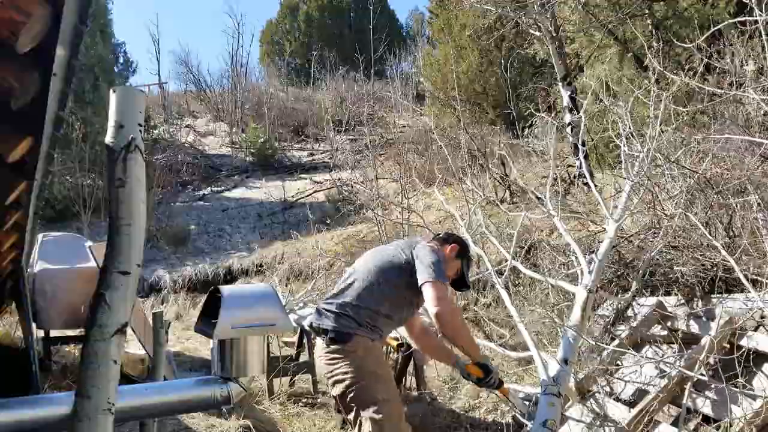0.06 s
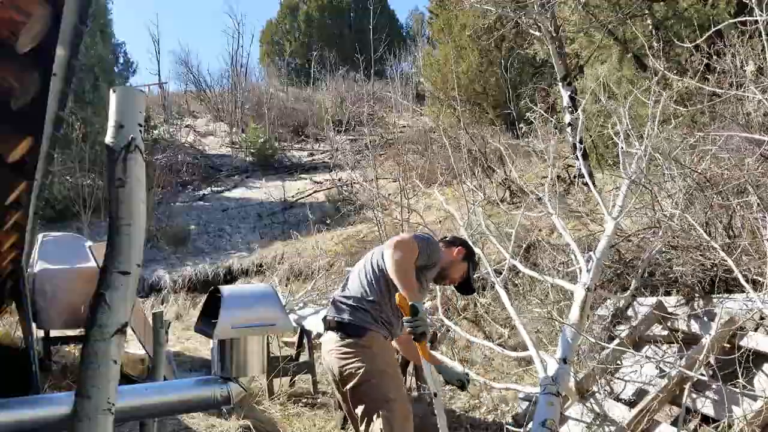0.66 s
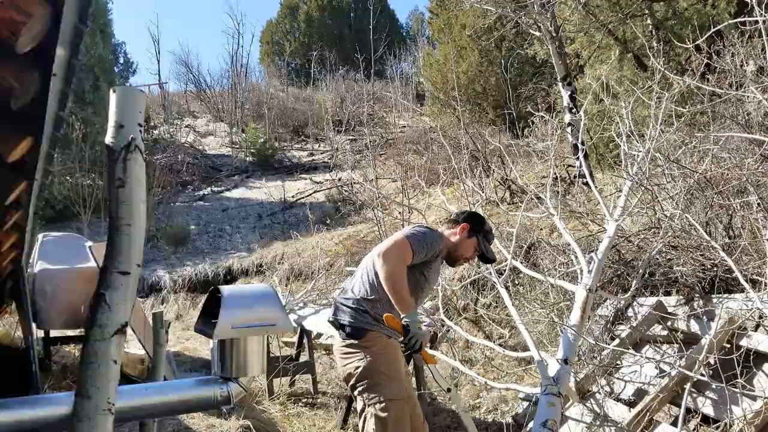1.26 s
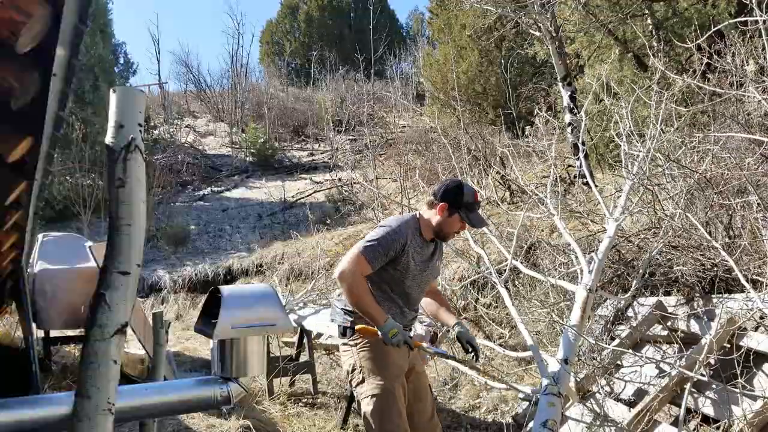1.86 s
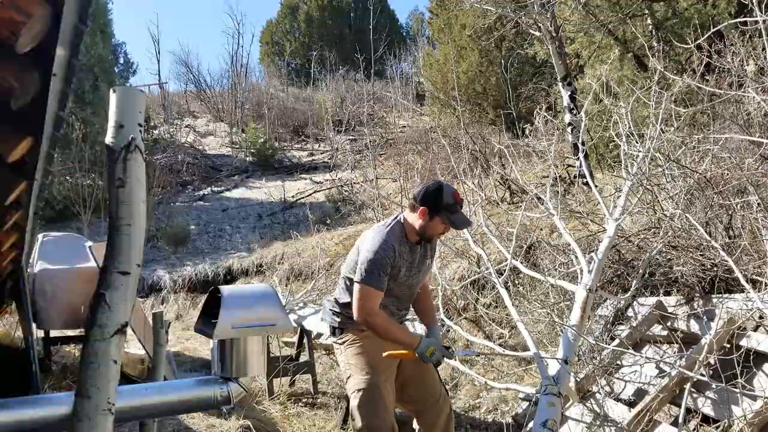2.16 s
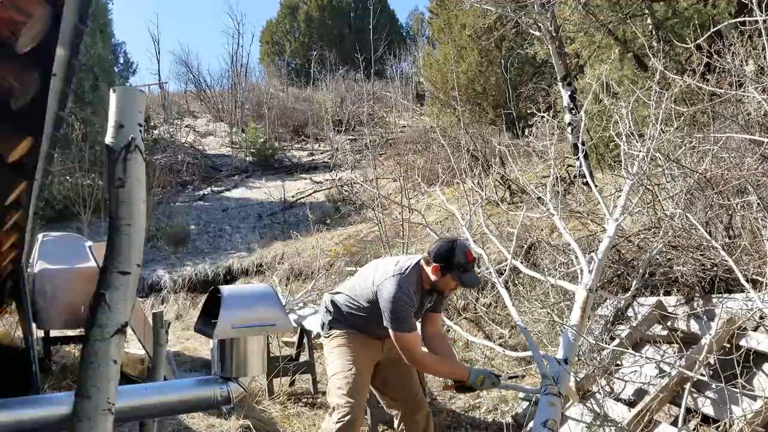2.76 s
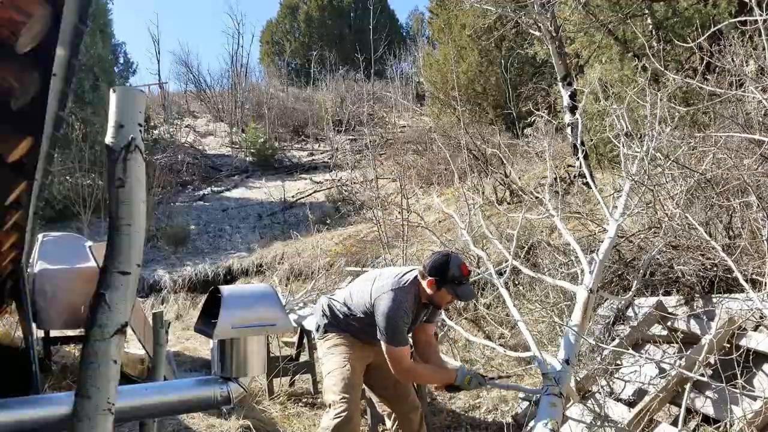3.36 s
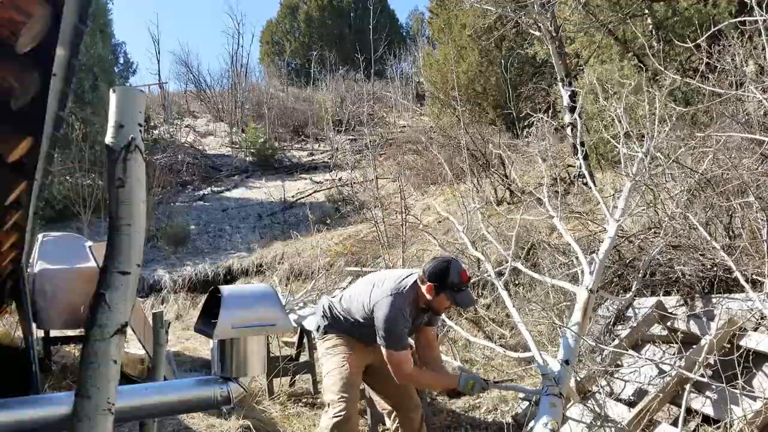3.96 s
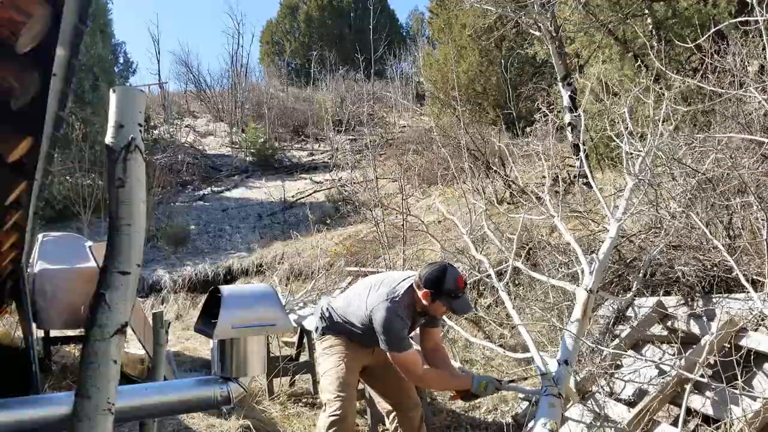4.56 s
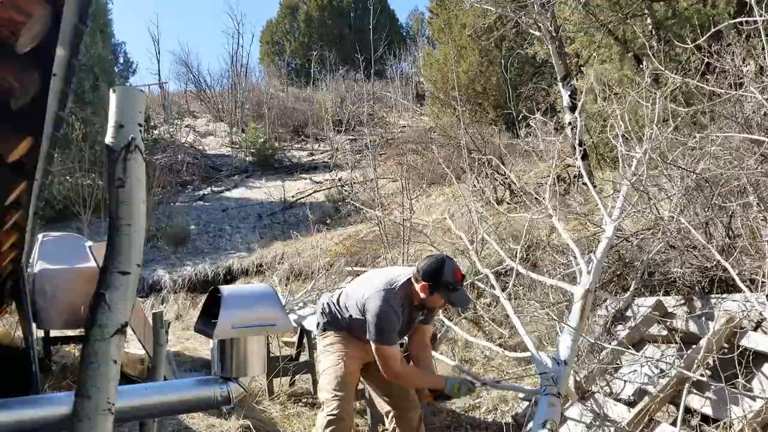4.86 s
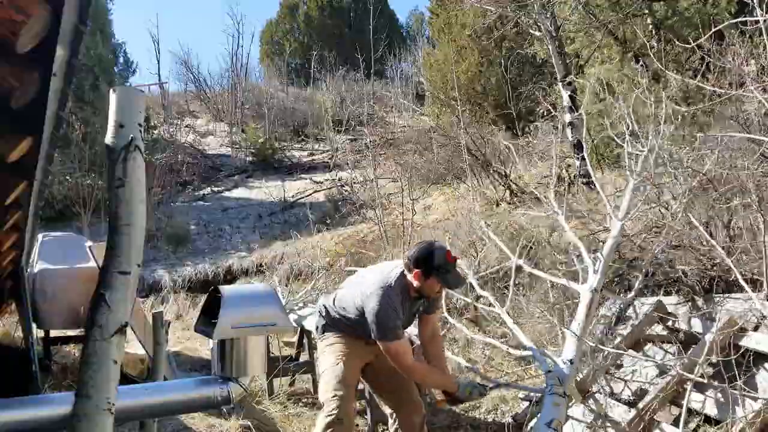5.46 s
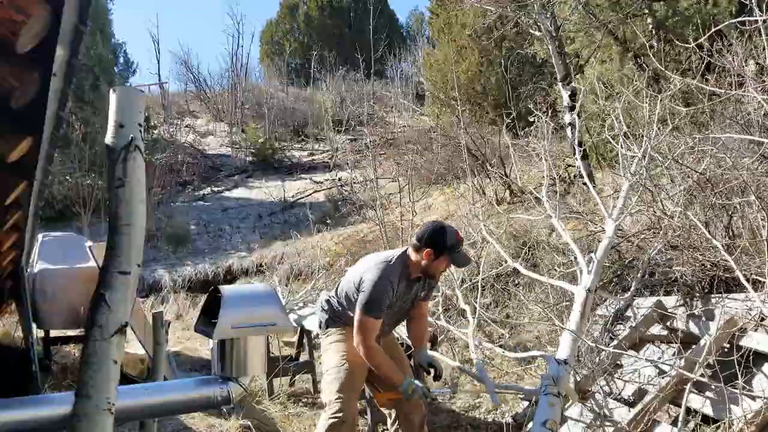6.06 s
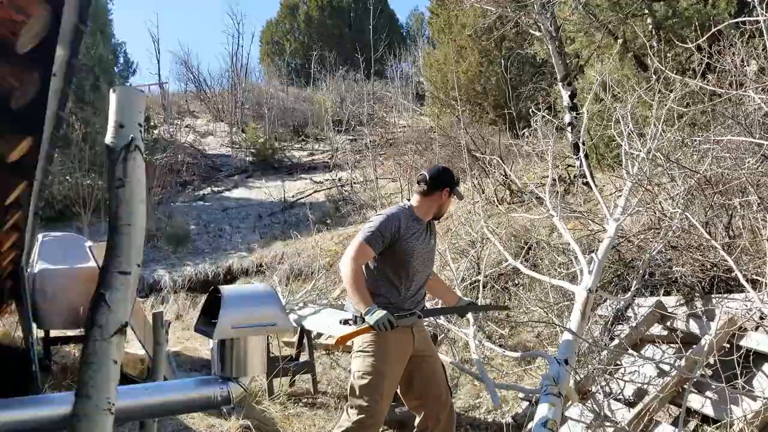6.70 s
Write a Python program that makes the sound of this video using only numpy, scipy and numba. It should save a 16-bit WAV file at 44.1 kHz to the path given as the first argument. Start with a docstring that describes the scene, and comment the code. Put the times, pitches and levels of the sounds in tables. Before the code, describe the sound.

A hand saw rasps through a green branch for four strokes, then the blade jumps out with a short clang. A few twigs tick and faint strokes brush the wood. Steady, buzzing back-and-forth sawing resumes until the branch tears, snaps and sinks with a rustle. It is outdoors, a few metres from the microphone, with dry grass hissing softly and gusts of wind rumbling mostly on the left.

```python
"""A hand saw rasps through a green branch on an open hillside, a few metres from a phone's two mic ports. Its
teeth shear wet fibres and shake the wood. After four strokes the blade jumps out and clangs; in faint strokes
it brushes twigs and dry grass, nine buzzing ones follow in the cut, and the branch tears, snaps and sinks. Dry
grass hisses in the breeze, and gusts buffet the ports, mostly the left."""
import sys
import numpy as np
from scipy import signal
from scipy.fft import rfft, irfft
from scipy.io import wavfile
from scipy.ndimage import uniform_filter1d
from numba import njit

SR = 44100
rng = np.random.default_rng(int(sys.argv[2]) if len(sys.argv) > 2 else 0)


def transcribe(signal):
    """Save signal, clipped to [-1, 1], as a 16-bit WAV file at the path in sys.argv[1]."""
    frames = np.atleast_2d(signal).T
    limited = np.clip(frames, -1, 1)
    pcm = np.round(limited * 32767).astype(np.int16)
    wavfile.write(sys.argv[1], SR, pcm)


N = 296793
TIME = np.arange(N) / SR
TOOTH_HZ = 380.3  # teeth crossing the cut each second at full speed
PORT_LAG_S = .0001  # the saw reaches the right port first
# spectrum of struck or cracking wood: frequency_hz, level_db
WOOD_CRACK = [(300, -20), (500, -11), (700, -5.5), (880, -5), (1100, 4), (1500, -4), (1800, .3),
              (2600, -0.5), (3100, -7), (4500, -14), (7500, -25), (15000, -27)]


def sawing():
    """Hiss of the steel, rasp of the wood and the hoarse note of the blade, all pulsed by the teeth."""
    steel = undb(1.16) * scattered(tooth_hiss, scatter_db=1.5, left_db=2.5)
    chatter = tooth_chatter()
    wood = scattered(wood_rasp, scatter_db=-5.5, left_db=1.0)
    note = scattered(blade_note, scatter_db=-5.5, left_db=1.5)
    return chatter * (steel + wood + note)


def strokes():
    """For each stroke: its samples, the blade speed 0-1 from turn to turn, and the rest of its row."""
    # saw strokes, the faint ones only the blade brushing twigs and dry grass: # start_s, fastest_s, end_s,
    # hiss_db, rasp_db, kerf_hz, note_hz, note_db
    saw_strokes = [(-.11, -.005, .095, -45.5, -50.5, 710, 4080, -58),
                   (0.084, .208, .295, -43, -50, 1460, 4200, -55),
                   (.29, 0.411, .51, -46.5, -52, 447, 4350, -59),
                   (.518, 0.597, .645, -41.5, -51, 620, 3800, -57),
                   (.915, 0.968, 1.06, -61.5, -73, 800, 3800, -76),
                   (1.232, 1.313, 1.41, -67.5, -77, 800, 2200, -78),
                   (1.608, 1.763, 1.9, -62.5, -71, 1350, 2200, -73),
                   (2.03, 2.197, 2.33, -57, -73, 1050, 2200, -73),
                   (2.571, 2.729, 2.87, -64, -64.5, 750, 2220, -78),
                   (2.945, 3.118, 3.265, -46, -55, 1455, 2340, -57),
                   (3.254, 3.391, 3.545, -47.5, -55, 1010, 2150, -58.5),
                   (3.555, 3.715, 3.845, -43.5, -52.5, 1400, 2480, -58.5),
                   (3.865, 3.984, 4.12, -48.5, -53, 1550, 2180, -56.5),
                   (4.114, 4.245, 4.355, -43, -50, 1360, 2170, -58),
                   (4.349, 4.46, 4.58, -44, -51, 1490, 2020, -56.5),
                   (4.58, 4.699, 4.81, -41.5, -49.5, 1370, 2450, -63),
                   (4.816, 4.929, 5.03, -47, -50, 1500, 2120, -65),
                   (5.01, 5.116, 5.265, -44.5, -54.5, 1390, 2380, -59),
                   (5.261, 5.39, 5.52, -57, -66.5, 1355, 2190, -74)]
    for start, fastest, end, *sound in saw_strokes:
        span = slice(max(int(start * SR), 0), int(end * SR))
        progress = np.interp(TIME[span], [start, fastest, end], [0, .5, 1])
        yield span, np.abs(np.sin(np.pi * progress)), sound


def grip(speed, seating=0.84):
    """How hard the teeth cut: it grows with blade speed, more slowly once they are seated."""
    return np.tanh(seating * speed) / np.tanh(seating)


def tooth_hiss(power=2.15, ring_db=-22, ring_rise_db_per_s=0.5):
    """Fibres shear on the teeth and faintly ring the blade, a little more as time goes on."""
    # spectrum of teeth shearing fibres: frequency_hz, level_db
    shear_spectrum = [(1200, -23), (2200, -8), (3200, -4.5), (4200, -3.5), (5200, -4.5), (7500, -2),
                      (9000, -4), (11000, -1.5), (13000, 1), (15500, -1.5)]
    shear, fractures = np.zeros(N), grains(per_s=7000, spread_db=1.5)
    for span, speed, (hiss_db, *_) in strokes():
        shear[span] += undb(hiss_db) * grip(speed) ** power * fractures[span]
    return colour(shear, shear_spectrum) + blade_ring(shear * undb(ring_db + ring_rise_db_per_s * TIME))


def tooth_chatter(depth=0.21):
    """A pulsing gain: teeth cross the cut at a rate set by the speed, each catching differently."""
    speed = np.zeros(N)
    for span, stroke_speed, _ in strokes():
        speed[span] = np.maximum(speed[span], stroke_speed)
    teeth_passed = np.cumsum(TOOTH_HZ * speed * (1 + 0.1203 * walk(90))) / SR
    catch_db = 1.6 * walk(320)
    return (1 + depth * speed * np.cos(2 * np.pi * teeth_passed)) * undb(catch_db)


def wood_rasp(power=2.2, kerf_width_hz=160, kerf_db=4, glide=.08, buzz_db=-19.5):
    """Coarse bites and tooth buzz shake the branch and the cut, whose resonance rises with speed."""
    # damped resonances of the wet branch: pitch_hz, width_hz, level_db
    branch_modes = [(417, 170, -0.5), (750, 250, 4), (1075, 230, 2.5), (1490, 370, -9.5)]
    wood, bites = np.zeros(N), grains(per_s=4000, spread_db=1.4)
    for span, speed, (_, rasp_db, kerf_hz, *_) in strokes():
        # grip and pressure change, so the tuning of the branch drifts during each stroke
        tuning = 1 + .05 * np.linspace(*rng.uniform(-1, 1, 2), len(speed))
        kerf = (kerf_hz * (1 + glide * (speed - 1)), kerf_width_hz, kerf_db)
        modes = [(hz * tuning, width, db) for hz, width, db in branch_modes] + [kerf]
        buzz = undb(buzz_db) * tooth_buzz(speed)
        body = np.zeros(len(speed))
        for hz, width, db in modes:
            own_bites = np.roll(bites[span], rng.integers(len(speed)))
            body += undb(db) * resonate(buzz + own_bites, hz, float(width))
        wood[span] += unit(body) * undb(rasp_db) * grip(speed) ** power
    return wood


def tooth_buzz(speed, jitter=.04, vary=.07, harmonics=6):
    """The row of teeth drums on the wood: a buzz that glides up and down with the blade speed."""
    uneven = np.repeat(rng.standard_normal(len(speed) // 200 + 1), 200)[:len(speed)]
    top_hz = TOOTH_HZ * (1 + vary * rng.uniform(-1, 1))  # no two strokes are equally fast
    phase = 2 * np.pi * np.cumsum(top_hz * speed * (1 + jitter * uneven)) / SR
    return sum(np.cos(k * phase) for k in range(1, harmonics + 1))


def blade_note(width_hz=580, glide=0.1, power=2.0):
    """The free length of the blade sings hoarsely, sliding up and down in turn as it runs in the cut."""
    out, scrape = np.zeros(N), noise()
    for index, (span, speed, (*_, note_hz, note_db)) in enumerate(strokes()):
        travel = np.cumsum(speed) / np.sum(speed) - .5
        hz = note_hz * (1 + (-1) ** index * glide * travel)
        note = resonate(resonate(scrape[span], hz, float(width_hz)), hz, float(2 * width_hz))
        out[span] += unit(note) * undb(note_db) * grip(speed) ** power
    return out


def blade_ring(force):
    """The steel blade rings in its bending modes."""
    # bending modes: pitch_hz, level_db, t60_s
    blade_modes = [(2729, -13, .07), (3828, 0, .28), (6508, -10, .06), (10410, -9, .06), (11640, -9, .06),
                   (12340, -7, .07), (13010, -8, .06), (13780, -9, .06)]
    return ring_modes(force, blade_modes)


def blade_knocks(ring_db=21, damped_s=0.712):
    """The blade jumps out and skips on the wood: the teeth rattle, and the first two knocks thud."""
    # knocks of the blade on the branch: time_s, level_db
    knocks = [(.6675, -30), (.670, -30.5), (.679, -36.5), (.683, -39.5)]
    # spectrum of the rattling teeth: frequency_hz, level_db
    clang_spectrum = [(400, -28), (800, -10), (1500, -4.5), (3000, -2.5), (4000, 2), (5000, -1),
                      (6300, 2.5), (8500, -2.5), (10500, 1), (13000, 4), (15500, 2)]
    rattle = colour(grains(per_s=8000, spread_db=2.5) * bursts(knocks, t60=0.047), clang_spectrum)
    thud = undb(-4.0) * colour(blows(knocks[:2]), WOOD_CRACK)
    # the second knock sets the blade ringing until a hand damps it
    damping = np.exp(-np.maximum(TIME - damped_s, 0) / 0.013)
    ring = undb(ring_db) * blade_ring(blows(knocks[1:2])) * damping
    ring_at_ports = np.array([undb(5.5) * delay(ring, PORT_LAG_S), ring])
    return outdoors(rattle + thud, scatter_db=2.0, left_db=2.5) + ring_at_ports


def breaking(click_db=12, ring_db=-9):
    """The branch tears and sinks; each snap is a click and fractures that ring it, plus splinters."""
    # snaps of wood and twigs: time_s, crack_db, splinter_db
    snaps = [(5.8001, -41.5, -51), (5.803, -46.5, -50), (5.807, -43, -44), (5.8277, -36.5, -48),
             (5.8308, -35, -36), (5.8327, -33, -38), (5.8339, -35, -42), (5.844, -47, -48),
             (5.851, -46, -48), (5.858, -48.5, -53), (5.868, -54, -53), (5.882, -52, -43),
             (5.897, -56, -54), (5.916, -55, -50), (6.06, -59, -63), (6.350, -59, -68), (6.629, -61, -62)]
    # ring of the breaking wood: pitch_hz, level_db, t60_s
    stub_modes = [(1070, -4, 0.027), (1270, -2, 0.027), (1740, -9, .035), (2354, -3, 0.073),
                  (2600, -4, .06)]
    # spectrum of the splinters: frequency_hz, level_db
    splinter_spectrum = [(1500, -20), (3500, 2), (5500, 3), (8000, -4.5), (15000, -2.5)]
    cracks = [(s, db) for s, db, _ in snaps]
    sprays = [(s, db) for s, _, db in snaps]
    force = grains(per_s=9000, spread_db=1.5) * bursts(cracks, t60=.014) + undb(click_db) * blows(cracks)
    wood = colour(force, WOOD_CRACK) + undb(ring_db) * ring_modes(force, stub_modes)
    splinters = colour(grains(per_s=12000, spread_db=3.0) * bursts(sprays, t60=0.023), splinter_spectrum)
    ports = outdoors(wood + splinters + tearing(), scatter_db=-3.0, left_db=0.5, scatter_t60=0.092)
    return ports + np.array([settling(), settling()])


def tearing():
    """The last strip of fibres rips in a quick, bright swell."""
    # swell of the rip: peak_s, peak_db, rise_db_per_s, fall_db_per_s
    rip = (5.729, -34.3, 718, 850)
    # spectrum of tearing fibres: frequency_hz, level_db
    fibre_spectrum = [(400, -34), (700, -16), (1100, -20.5), (4200, -19), (6000, -5), (7600, -6),
                      (11000, -10), (15500, -7)]
    return colour(grains(per_s=12000, spread_db=2.0) * swell(*rip), fibre_spectrum)


def settling():
    """Twigs and dry grass rustle under the sinking branch."""
    # course of the rustle: time_s, level_db
    rustle = [(5.25, -100), (5.45, -63), (5.67, -61.5), (5.9, -58.5), (6.08, -61.5), (6.3, -73), (6.6, -85)]
    # spectrum of the twigs: frequency_hz, level_db
    twig_spectrum = [(300, 9.5), (650, 6.0), (1000, -4), (2500, 0.0), (8000, -1), (15000, 0)]
    return colour(grains(per_s=4000, spread_db=3.0) * curve(rustle), twig_spectrum)


def twig_ticks(click_db=12):
    """Dry twigs break against the saw, each with one click and a few milliseconds of crackle."""
    # breaking twigs: time_s, level_db
    ticks = [(.897, -58), (.947, -48.5), (.951, -48), (1.18, -56), (2.481, -52), (2.519, -52)]
    # spectrum of a tick: frequency_hz, level_db
    tick_spectrum = [(700, -18), (2000, -2), (5000, 4), (8000, 1.5), (12000, -1), (15500, -6)]
    crackle = grains(per_s=6000, spread_db=2.5) * bursts(ticks, t60=.02)
    twigs = colour(crackle + undb(click_db) * blows(ticks), tick_spectrum)
    return outdoors(twigs, scatter_db=2.0, left_db=6.0)


def wind_pressure(port, steady_db, attack_s=0.047, release_s=0.059):
    """Wind strength at one port (0 left, 1 right): gusts rise, hold and let go over the steady flow."""
    # steady push of the wind: time_s, level_db
    flow = [(0, -48), (.4, -46), (.92, -48.5), (1.52, -54.5), (1.79, -46), (2.15, -52), (2.45, -39.5),
            (2.87, -46.5), (3.5, -39), (3.72, -46.5), (3.88, -59), (4.09, -36), (4.22, -53), (4.46, -37),
            (5.0, -43.5), (5.35, -45), (5.6, -61.5), (6.03, -54.5), (6.5, -39), (6.73, -34.5)]
    # gusts on the ports: start_s, length_s, left_db, right_db
    gusts = [(0.018, 0.042, -45, -35.5), (0.189, 0.16, -35.5, -54), (0.49, 0.11, -35.5, -55),
             (0.85, .04, -37.5, -60), (1.632, 0.12, -36, -47), (1.888, 0.028, -33.5, -54),
             (2.176, 0.12, -33.5, -47), (2.376, .04, -29.5, -50), (2.578, 0.05, -30.5, -40.5),
             (2.787, 0.033, -34, -35.5), (2.926, 0.015, -33, -46), (3.079, 0.098, -22.5, -36),
             (3.232, 0.05, -25, -38), (3.381, 0.093, -38.5, -35), (3.714, .015, -29, -59),
             (3.95, .15, -27, -38), (4.31, .17, -25, -30.5), (4.642, 0.019, -26, -37),
             (4.742, 0.05, -22, -43), (4.816, 0.069, -24, -34.5), (5.112, 0.085, -30.5, -39),
             (6.278, 0.074, -35, -48), (6.414, 0.02, -27.5, -39), (6.516, 0.049, -31, -30),
             (6.705, .03, -24.5, -36)]
    power = (curve(flow) * undb(steady_db)) ** 2
    for start, length, *port_db in gusts:
        corners = [start - attack_s, start, start + length, start + length + release_s]
        power += (undb(port_db[port]) * np.interp(TIME, corners, [0, 1, 1, 0])) ** 2
    return np.sqrt(power)


def buffeting(pressure, strong_db=-22, flutter_db=-12, flutter_power=1.81, burst_db=4, ceiling_db=-19):
    """Eddies hit one port; strong gusts also shed smaller, faster eddies in bursts."""
    # spectrum of the large eddies: frequency_hz, level_db
    rumble_spectrum = [(12, -17.5), (30, -3.5), (50, 1.5), (95, 2.5), (140, -3), (200, -13), (280, -25.5),
                       (400, -47), (700, -63.5)]
    # spectrum of the small eddies: frequency_hz, level_db
    flutter_spectrum = [(70, -26), (150, 3), (230, 4), (320, -5.5), (430, -18), (600, -22.5), (1000, -42),
                        (2000, -73)]
    rumble = colour(noise(), rumble_spectrum)
    # the rumble follows the gusts closely and levels off in the hardest ones
    rumble /= np.sqrt(uniform_filter1d(rumble ** 2, size=3000) + 0.0079)
    push = pressure / np.hypot(1, pressure / undb(ceiling_db))
    bumps = unit(undb(3.2 * walk(34)))  # the flow catches and lets go of the port
    flutter = unit(colour(noise() * undb(burst_db * walk(70)), flutter_spectrum))
    shedding = undb(strong_db + flutter_db) * (pressure / undb(strong_db)) ** flutter_power
    return bumps * (push * rumble + shedding * flutter)


def thumps(core=0.36):
    """Single vortices pass the left port: each is one steep swing of pressure with slow skirts."""
    # vortices, a higher rate giving a shorter thump: centre_s, peak_db, rate_hz
    vortices = [(0.518, -19.5, 106), (0.884, -31, 131), (1.379, -25, 108), (1.410, -31.5, 148),
                (2.173, -21.5, 129.8), (2.416, -19, 148), (3.104, -16, 190), (3.125, -16, 269),
                (3.299, -13.5, 171), (3.425, -24, 198), (3.725, -20, 110), (3.937, -20.5, 171.7),
                (4.305, -16.5, 173), (4.40, -12.5, 185.9), (4.455, -19.5, 188), (4.657, -21.5, 180),
                (4.754, -17, 130), (4.783, -9.5, 152), (4.899, -22, 241), (5.125, -19, 129.7),
                (5.154, -17.5, 220.5), (5.18, -22, 200), (5.232, -22.5, 198), (6.424, -24.5, 116)]
    out = np.zeros((2, N))
    for s, db, hz in vortices:
        span = slice(int(s * SR) - SR // 25, int(s * SR) + SR // 25)
        offset = (TIME[span] - s) * hz / core
        swing = np.pi * offset / (1 + offset ** 2) ** 2
        out[0, span] -= undb(db) * swing * np.hanning(len(swing))
    return out


def grass_hiss(lead_s=0.000473, diffuse_db=5.5, left_db=4):
    """Dry grass hisses in the breeze, all around and from one patch to the left."""
    # breeze on the slope: time_s, level_db
    breeze = [(0, -56.5), (1.2, -61.5), (2.7, -60.5), (4.9, -58.5), (5.3, -61), (5.6, -69.5), (6.0, -63),
              (6.7, -60.5)]
    # spectrum of the dry grass: frequency_hz, level_db
    grass_spectrum = [(200, 3.5), (500, 0.5), (750, -2.5), (1100, 0), (1800, -4), (3800, -4.5),
                      (7000, -8.5), (11000, -13), (13000, -15), (15500, -44)]
    patch = noise() * undb(0.25 * walk(33))
    ports = [(patch, left_db / 2), (delay(patch, lead_s), -left_db / 2)]
    hiss = [undb(db) * colour(x + undb(diffuse_db) * noise(), grass_spectrum) for x, db in ports]
    return unit(np.array(hiss)) * curve(breeze)


def outdoors(x, scatter_db, left_db, scatter_t60=0.11, slope_db=-19, slope_t60=0.51):
    """Direct sound at two ports, quick scatter off ground and trunks, and a faint echo from the slope."""
    ports = []
    for direct, side in ((delay(x, PORT_LAG_S), 1), (x, -1)):
        echo = undb(scatter_db) * echo_tail(scatter_t60) + undb(slope_db) * echo_tail(slope_t60)
        ports.append((direct + signal.oaconvolve(x, echo)[:N]) * undb(side * left_db / 2))
    return np.array(ports) / np.hypot(1, undb(scatter_db))


def scattered(source, scatter_db, left_db, ground_db=-5):
    """A source over the ground; a fresh draw per port stands for scatter off the moving saw and branch."""
    near = outdoors(source(), scatter_db=ground_db, left_db=-0.5, scatter_t60=0.06)
    ports = near + undb(scatter_db) * np.array([source(), source()])
    return ports * undb([[left_db / 2], [-left_db / 2]]) / np.hypot(1, undb(scatter_db))


def echo_tail(t60):
    """Dense reflections: decaying noise of energy 1."""
    return unit(rng.standard_normal(SR // 2) * fade(t60)) / np.sqrt(SR // 2)


def ring_modes(x, modes):
    """Modes of (pitch_hz, level_db, t60_s), driven by x."""
    ring = sum(undb(db) * np.sin(2 * np.pi * hz * TIME[:SR // 2]) * fade(t60) for hz, db, t60 in modes)
    return signal.oaconvolve(x, ring / np.sqrt(np.sum(ring ** 2)))[:N]


@njit
def resonate(x, hz, width_hz):
    """One resonance whose centre moves, gain 1 there."""
    out, band, low = np.empty(len(x)), 0., 0.
    for i in range(len(x)):
        step, damping = np.tan(np.pi * hz[i] / SR), width_hz / hz[i]
        v = (band + step * (x[i] - low)) / (1 + step * (step + damping))
        band, low = 2 * v - band, low + 2 * step * v
        out[i] = damping * v
    return out


def colour(x, points):
    """Causal filter through (frequency_hz, level_db) points, keeping the power of white noise."""
    hz, db = np.transpose(points)
    bins_hz = np.fft.rfftfreq(4096, 1 / SR)
    gain = unit(undb(np.interp(np.log(bins_hz + 1), np.log(hz), db)))
    cepstrum = irfft(np.log(gain))
    half = len(cepstrum) // 2
    cepstrum[1:half] *= 2  # fold to minimum phase
    cepstrum[half + 1:] = 0
    return signal.oaconvolve(x, irfft(np.exp(rfft(cepstrum))))[:N]


def delay(x, seconds):
    """Delay by a fraction of a millisecond; longer lags also come out weaker."""
    lag = np.arange(-64, 65) - seconds * SR
    return signal.oaconvolve(x, np.sinc(lag) * np.exp(-(lag / 20) ** 2), "same")


def grains(per_s, spread_db):
    """Tiny random fractures, a few much larger than the rest."""
    total = int(per_s * N / SR)
    sizes = undb(spread_db * np.minimum(rng.exponential(size=total), 4))
    positions = rng.integers(N, size=total)
    return unit(np.bincount(positions, sizes * rng.choice([-1, 1], total), minlength=N))


def blows(rows):
    """One impulse for each row of (time_s, level_db)."""
    out = np.zeros(N)
    for s, db in rows:
        out[int(s * SR)] += undb(db)
    return out


def bursts(rows, t60):
    """An envelope that jumps at each row of (time_s, level_db) and dies away."""
    return signal.lfilter([1], [1, -np.exp(-np.log(1000) / (t60 * SR))], blows(rows) + 1e-18)


def swell(peak_s, peak_db, rise_db_per_s, fall_db_per_s):
    """An envelope that grows to one peak and dies away."""
    below_db = np.maximum((peak_s - TIME) * rise_db_per_s, (TIME - peak_s) * fall_db_per_s)
    return undb(peak_db - np.minimum(below_db, 200))


def curve(rows):
    """Gain over time from rows of (time_s, level_db), joined by straight lines."""
    return undb(np.interp(TIME, *np.transpose(rows)))


def fade(t60):
    """Half a second of exponential decay."""
    return np.exp(-np.log(1000) * TIME[:SR // 2] / t60)


def walk(rate_hz):
    """Smooth random drift with a spread near 1."""
    knots = rng.standard_normal(int(rate_hz * N / SR) + 2)
    return np.interp(TIME * rate_hz, np.arange(len(knots)), knots) * np.sqrt(3 / 2)


def noise():
    """White noise of rms 1."""
    return rng.standard_normal(N)


def unit(x):
    """Scale to rms 1."""
    return x / np.sqrt(np.mean(x ** 2))


def undb(db):
    """Decibels to gain."""
    return np.exp(np.asarray(db) * (np.log(10) / 20))


def scene():
    """Saw, breaking branch and hillside at the two ports; the left one faces the wind."""
    left_wind = buffeting(wind_pressure(0, steady_db=1.5))
    right_wind = buffeting(wind_pressure(1, steady_db=-1.5))
    work = sawing() + blade_knocks() + twig_ticks() + breaking()
    return work + np.array([left_wind, right_wind]) + thumps() + grass_hiss()


def record(dry, low_hz=32, top_hz=15750):
    """The microphone ports lose the deepest bass and the phone cuts the top."""
    thinned = signal.sosfilt(signal.butter(1, low_hz, "high", fs=SR, output="sos"), dry)
    return signal.sosfilt(signal.ellip(10, .2, 70, top_hz, fs=SR, output="sos"), thinned)


dry = scene()
out = record(dry)
transcribe(out)
```